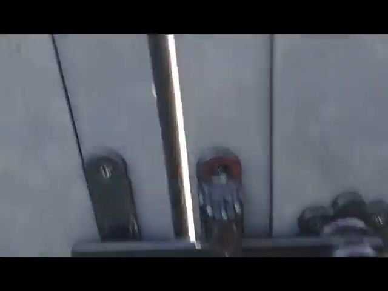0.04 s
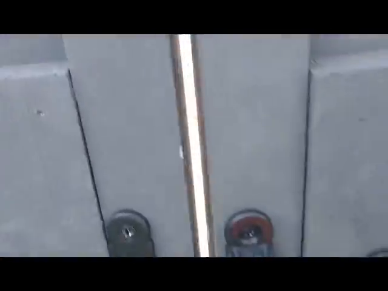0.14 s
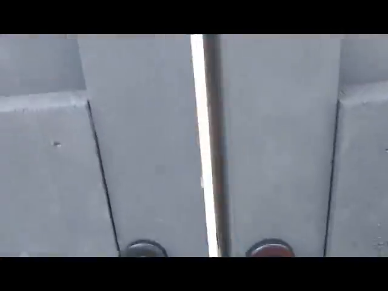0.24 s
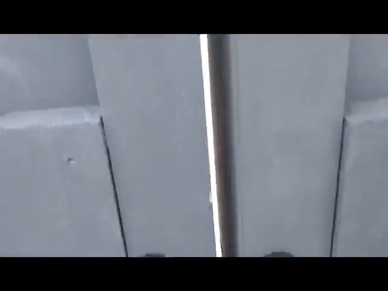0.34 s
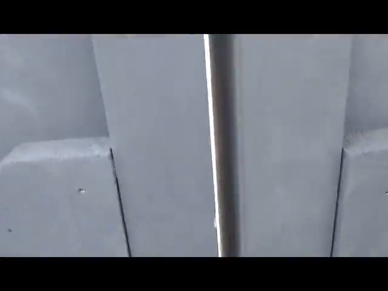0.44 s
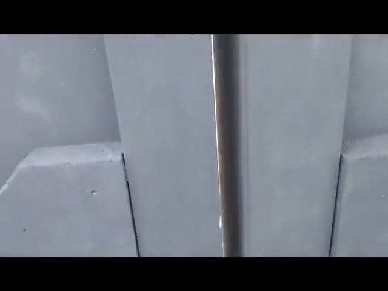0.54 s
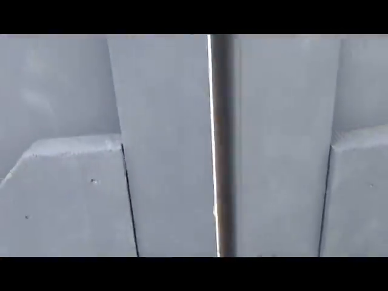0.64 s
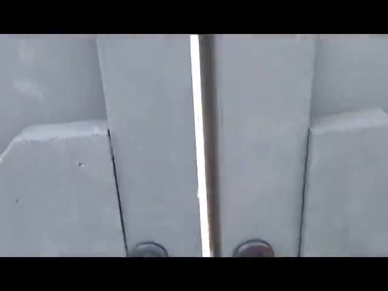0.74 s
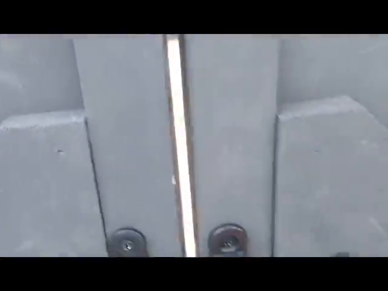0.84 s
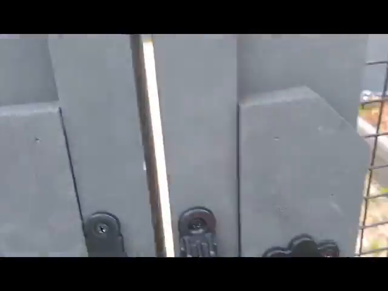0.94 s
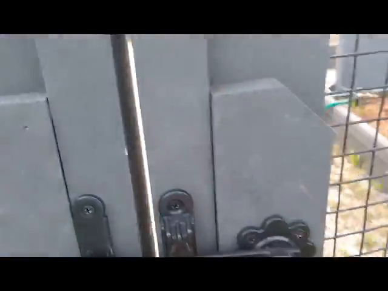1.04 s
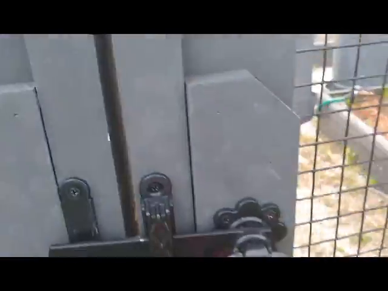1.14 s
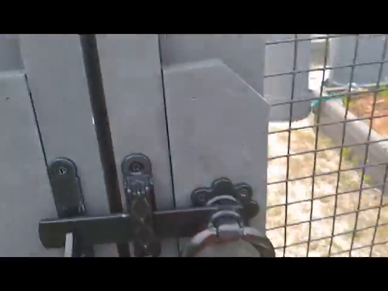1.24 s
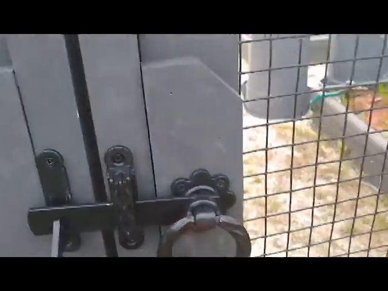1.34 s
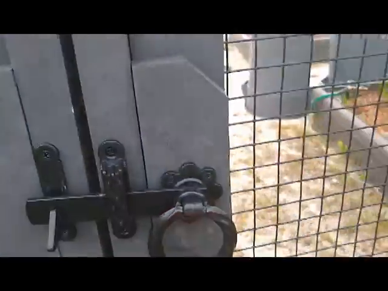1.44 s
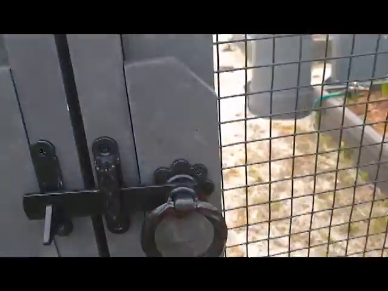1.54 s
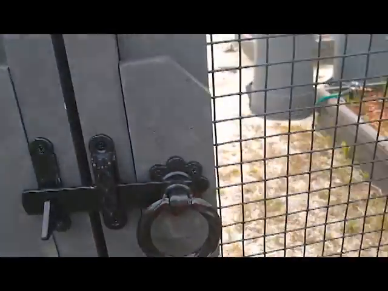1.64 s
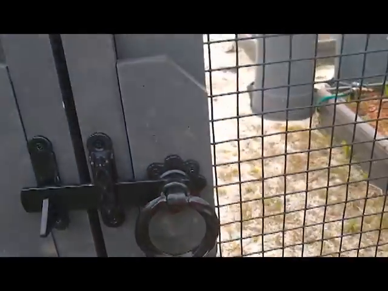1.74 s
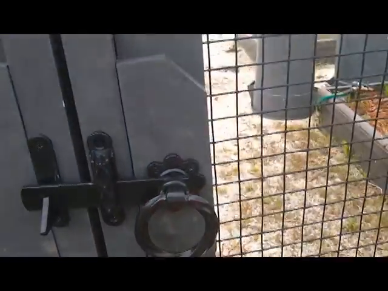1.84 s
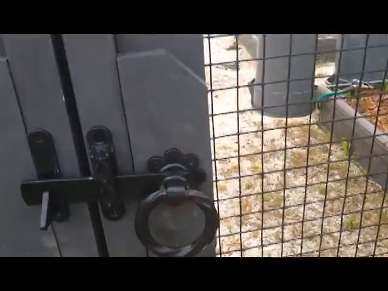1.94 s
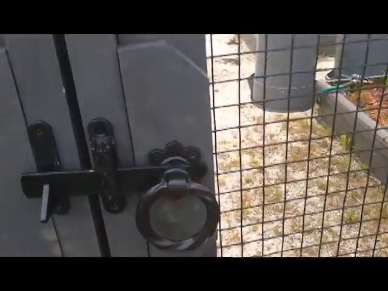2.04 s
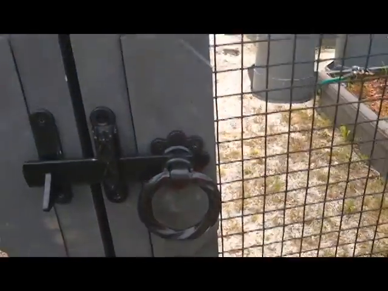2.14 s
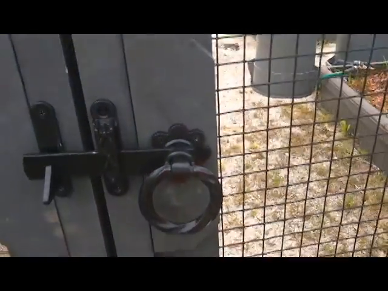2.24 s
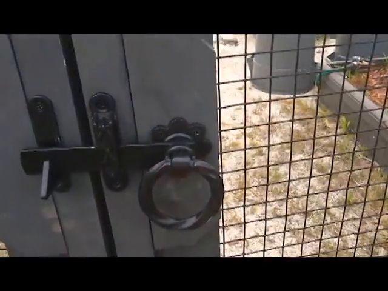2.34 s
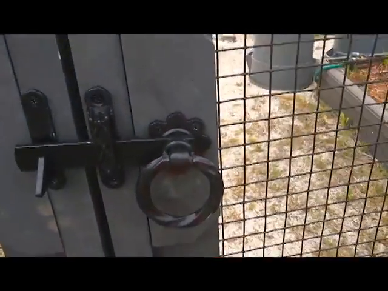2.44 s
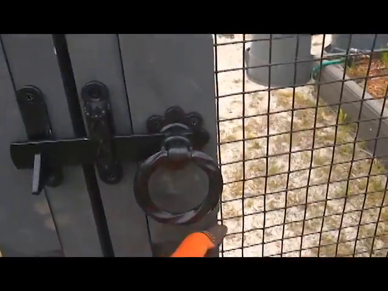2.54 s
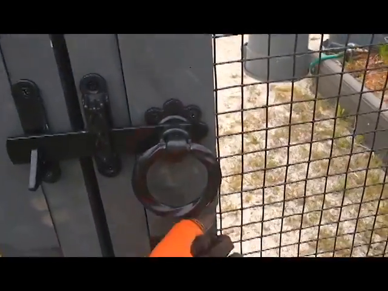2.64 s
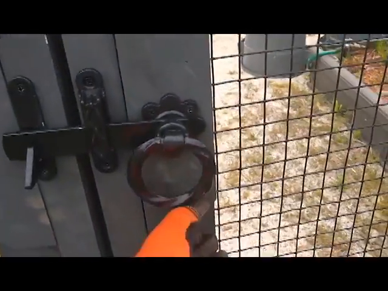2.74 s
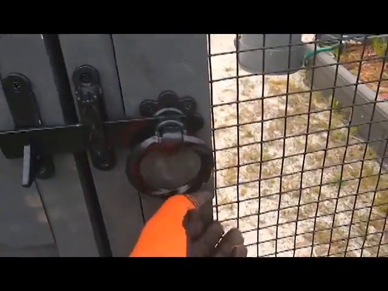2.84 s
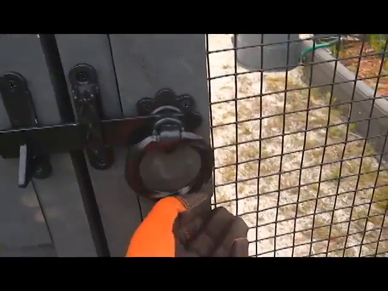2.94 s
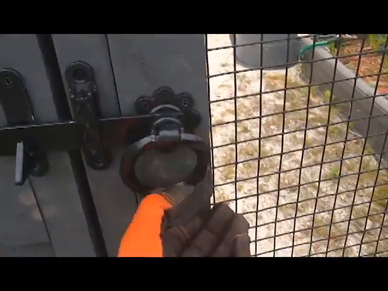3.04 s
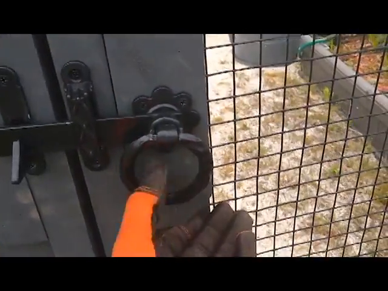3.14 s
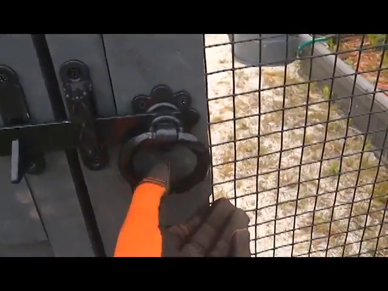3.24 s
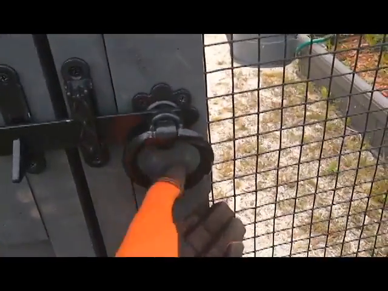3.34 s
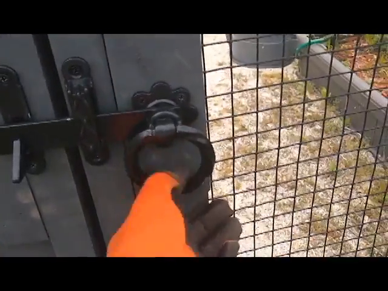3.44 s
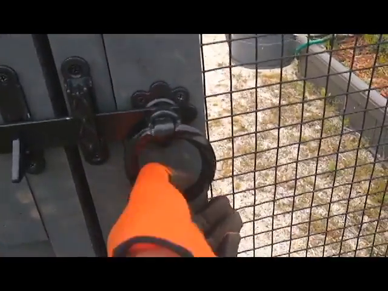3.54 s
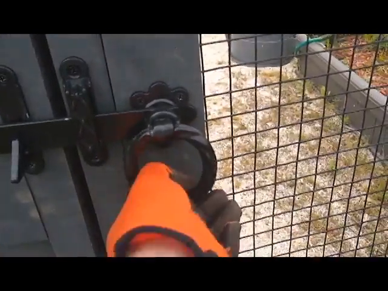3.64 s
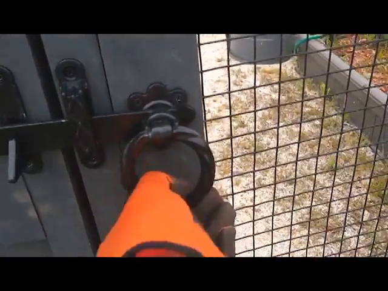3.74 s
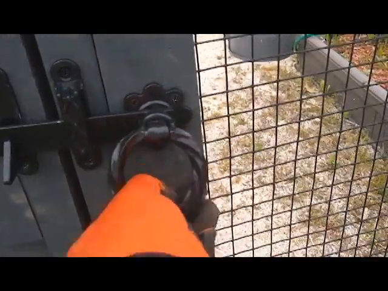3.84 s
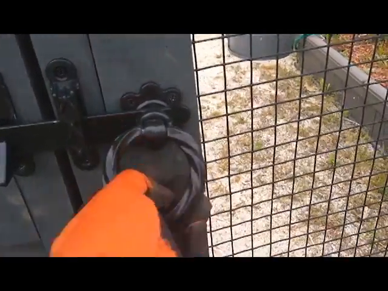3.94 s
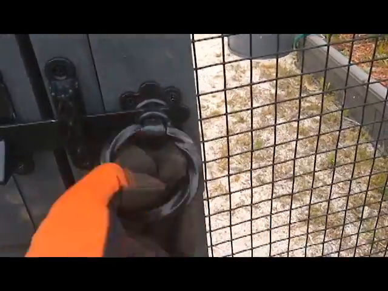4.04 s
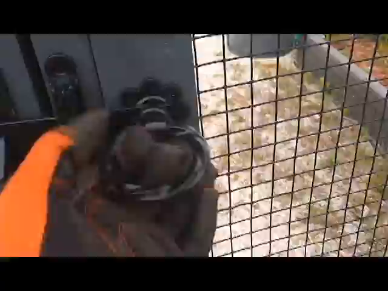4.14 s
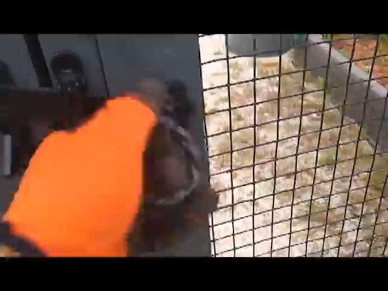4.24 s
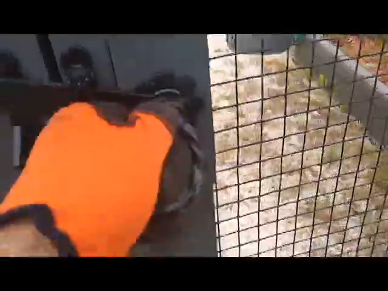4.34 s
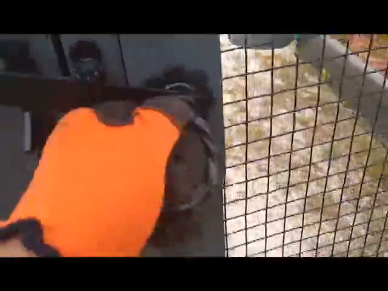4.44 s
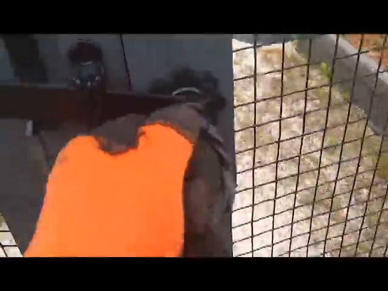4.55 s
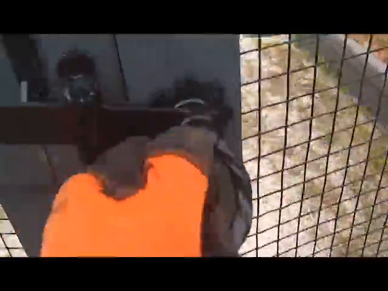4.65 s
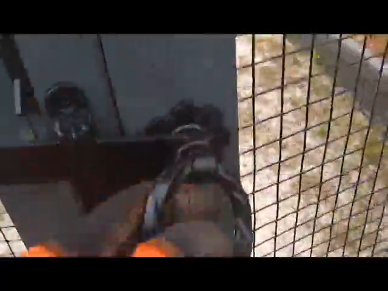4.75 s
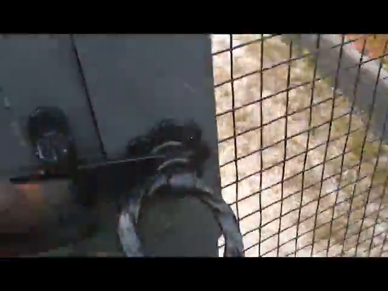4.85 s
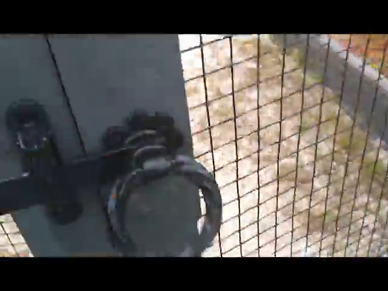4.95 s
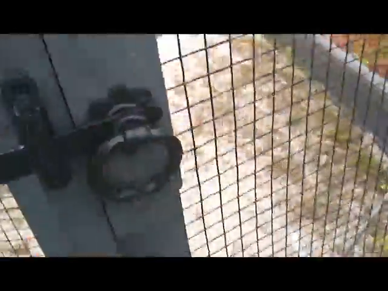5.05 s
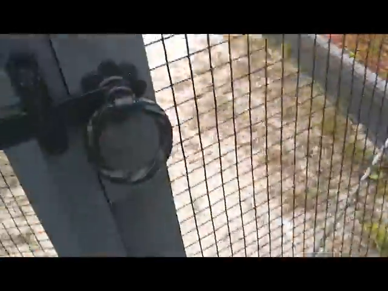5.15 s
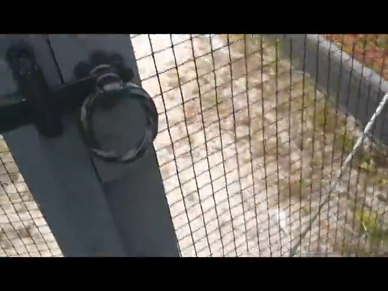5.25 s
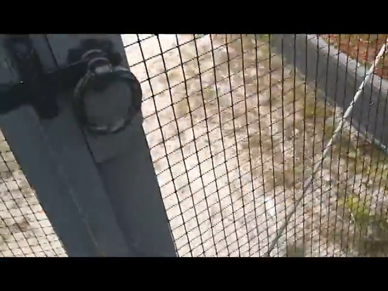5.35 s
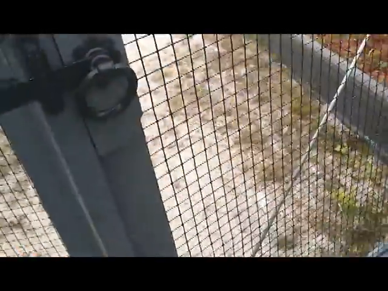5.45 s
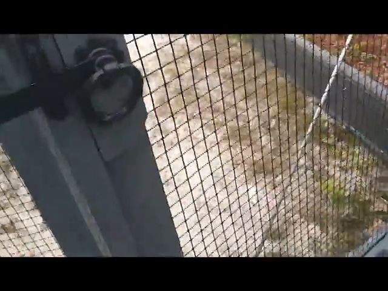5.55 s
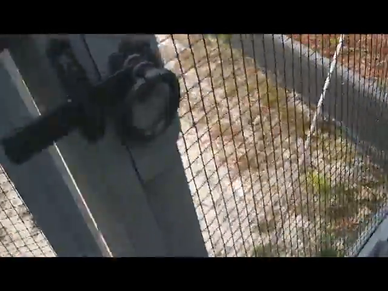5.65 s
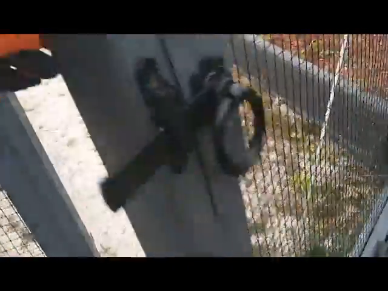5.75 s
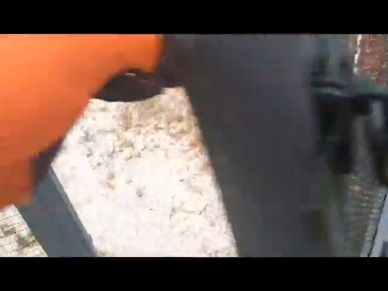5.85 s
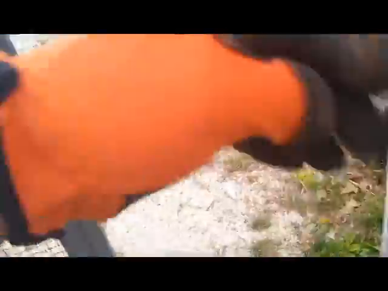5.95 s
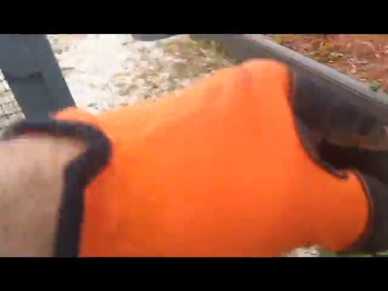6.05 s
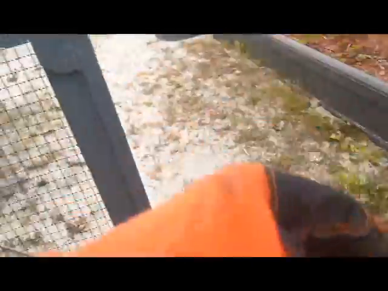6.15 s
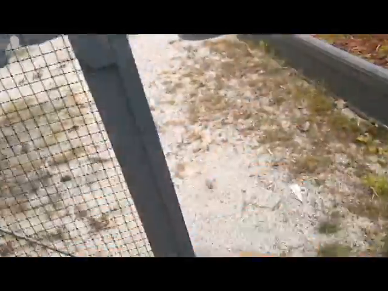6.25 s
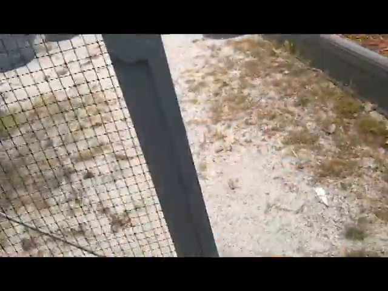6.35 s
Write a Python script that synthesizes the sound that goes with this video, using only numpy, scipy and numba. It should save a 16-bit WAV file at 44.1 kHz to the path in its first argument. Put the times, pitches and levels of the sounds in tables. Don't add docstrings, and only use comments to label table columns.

```python
import sys
import numpy as np
from scipy import signal
from scipy.fft import rfft, irfft
from scipy.io import wavfile
from scipy.ndimage import uniform_filter1d
from numba import njit

SR = 44100
rng = np.random.default_rng(int(sys.argv[2]) if len(sys.argv) > 2 else 0)


def dump(signal):
    limited = np.clip(np.atleast_2d(signal).T, -1, 1)
    pcm = np.round(limited * 32767).astype(np.int16)
    wavfile.write(sys.argv[1], SR, pcm)


def volts_from_db(level):
    exponent = np.asarray(level, float) / 20
    return 10 ** exponent


N = 282681
PORT_LAG = 6


def level(x, db=0):
    return x * volts_from_db(db) / np.sqrt(np.mean(x ** 2))


def columns(table):
    s, *cols = np.transpose(table)
    return [np.interp(np.arange(N) / SR, s, c) for c in cols]


def colour(x, spectrum):
    hz, db = np.transpose(spectrum)
    f = np.maximum(np.arange(x.shape[-1] // 2 + 1) * SR / x.shape[-1], 1)
    octaves_outside = np.maximum(np.log2(hz[0] / f), 0) + np.maximum(np.log2(f / hz[-1]), 0)
    gain_db = np.interp(np.log(f), np.log(hz), db) - 48 * octaves_outside
    return irfft(rfft(x) * volts_from_db(gain_db), x.shape[-1])


def walk(rate):
    k = int(SR / rate)
    steps = np.repeat(rng.standard_normal(N // k + 1), k)
    return 1.28 * uniform_filter1d(uniform_filter1d(steps, k), k)[:N]


def pair(likeness):
    common, apart = rng.standard_normal((2, N))
    c = np.clip(likeness, 0, 1)
    return np.sqrt(1 + c) * common + np.sqrt(1 - c) * apart * np.array([[1], [-1]])


def swell(s, length):
    return np.sin(np.pi * np.clip((np.arange(N) / SR - s) / length, 0, 1))


def decay(t, t60):
    return np.exp(-np.log(1000) * t / t60)


def add(out, s, sound):
    i = int(s * SR)
    out[:, i:i + sound.shape[1]] += sound[:, :N - i]


def whistle(table, start=0, db=0):
    rows = np.array(table) + [start, 0, db]
    before = [rows[0, 0] - .008, rows[0, 1], -120]
    after = [rows[-1, 0] + .025, rows[-1, 1], -120]
    hz, line_db = columns([before, *rows, after])
    return np.sqrt(2) * volts_from_db(line_db) * np.sin(2 * np.pi * np.cumsum(hz) / SR)


@njit
def mode(x, hz, t60):
    y, z, turn = np.empty(len(x), np.complex128), 0j, np.exp(2j * np.pi * hz / SR)
    for i in range(len(x)):
        z = z * turn * (1 - np.log(1000.) / (t60[i] * SR)) + x[i]
        y[i] = z
    return y


def clatter(lo_hz, hi_hz, t60, chance, rise_s=0.00051):
    t = np.arange(4096) / SR
    hz_chance, fade_chance, phase_chance, level_chance, side_chance = chance.T[:, :, None]
    hz = lo_hz * (hi_hz / lo_hz) ** hz_chance
    strength = volts_from_db(14.0 * level_chance) * decay(t, t60 * (0.65 + 2.28 * fade_chance))
    phase = 2 * np.pi * (hz * t + phase_chance)
    lead = 3.76 * np.minimum(hz / 1500, 1) ** 2 * (side_chance - .5)
    both = np.array([np.sum(strength * np.sin(phase + side * lead), axis=0) for side in (1, -1)])
    both = both * (1 - np.exp(-t / rise_s))
    return both / np.abs(both).max()


# f/Hz, level/dB per Hz
GARDEN_HUSH = [(200, 2.5), (500, -11), (1100, -29.5), (5000, -28), (15800, -20)]


def garden_hush():
    return level(colour(pair(0.18), GARDEN_HUSH), -80.5)


# t/s, gust level/dB, hollow murmur re gust level/dB
WIND = [(0, -55, -19.5), (.8, -74.5, 8.5), (1.25, -57.5, -11.5), (1.5, -58, -12), (2.1, -63, -14.5),
        (4.3, -61, 0.5), (4.37, -31, -15), (4.7, -68, 5.5), (5.1, -48.5, -3), (5.4, -62.5, -9),
        (5.9, -54, -16), (6.41, -43, -35)]
# f/Hz, level/dB per Hz
RUMBLE = [(12, -62), (20, -44), (32, -23.5), (73, -1), (103, -1), (177, -14), (287, -36.5), (330, -16),
          (430, -68), (730, -120)]
# t/s, peak level/dB
BUFFETS = [
    (5.724, -36.5),
    (5.918, -27.5),
    (6.016, -50),
    (6.086, -34.5),
    (6.162, -30.5),
    (6.194, -35.5),
    (6.251, -31.5),
    (6.337, -28),
]


def wind():
    rumble_db, murmur_db = columns(WIND)
    gusts = volts_from_db(2.5 * walk(14))
    out = level(colour(pair(.7) * gusts, RUMBLE)) * volts_from_db(rumble_db)
    for (s, peak_db), c in zip(BUFFETS, rng.random((len(BUFFETS), 16, 5))):
        add(out, s, volts_from_db(peak_db - 2.0) * clatter(60, 228.5, 0.054, c, rise_s=0.0045))
    out[1] = irfft(rfft(out[1]) * np.exp(1j * 1.4), N)
    for hz in (454.0, 540, 572, 570.0, 760, 1440):
        band = colour(pair(0.04), [(hz * 0.94, -10), (hz, 0), (hz * 0.88, -10)])
        band_db = rumble_db + murmur_db - 9 - 14 * (hz > 999) + 6 * walk(22)
        out = out + level(band) * volts_from_db(band_db + np.array([[1.2], [-1.2]]))
    return out


# t/s, length/s, f/Hz, level/dB
MURMURS = [
    (0.132, 0.1, 623, -66),
    (0.394, 0.12, 569, -64),
    (0.634, 0.091, 567, -66),
    (0.86, 0.21, 1270, -75.5),
    (1.072, 0.12, 1220, -73),
    (1.1, 0.27, 540, -57),
]


def murmurs():
    out = 0
    noise = pair(.6) * volts_from_db(4 * walk(40))
    for s, length, hz, db in MURMURS:
        band = colour(noise, [(hz * .85, -8), (hz, 0), (hz * 1.12, -8)])
        out = out + level(band, db) * swell(s, length)
    return out


# t/s, f/Hz, level/dB
ARCH = [(2.115, 7960, -86), (2.17, 8740, -71), (2.23, 9020, -67), (2.31, 8810, -59.5), (2.38, 8200, -69.5),
        (2.46, 6920, -56.5), (2.48, 6800, -88)]
FLAT = [(2.2, 7330, -69), (2.23, 6940, -96), (2.38, 7500, -76)]
# t/s from its start, f/Hz, level/dB
WARBLE = [(.012, 7900, -10), (.03, 8120, 2), (.05, 6740, -5), (.075, 6370, 0), (.09, 6150, -2),
          (.115, 7100, 8), (.135, 6060, 4.5), (.155, 4880, -6)]
# t/s, level/dB
WARBLES = [
    (0.888, -73),
    (1.524, -72.5),
]
# t/s from its start, f/Hz, level/dB
CHIRP_HIGH = [(.004, 3560, -9), (.014, 3710, -2.5), (.03, 3800, 8), (.042, 3950, -8.5)]
CHIRP_UPPER = [(.006, 4060, -6), (.022, 4160, -5), (.036, 4150, 1.5), (.042, 3950, -1)]
CHIRP_LOW = [(0.046, 2860, -16), (0.052, 3130, 3), (.063, 3260, 4)]
# t/s, level/dB
CHIRPS = [
    (0.336, -56.5),
    (1.849, -64.5),
    (2.631, -93),
    (2.781, -56),
    (3.738, -55),
]
# delay t/s, level over the smeared echo/dB
WALLS = [
    (.05, -9.5),
    (.145, 3),
    (.235, 5.5),
    (.345, 8.5),
]


def birds():
    thin = whistle(ARCH) + whistle(FLAT) * volts_from_db(8.7 * walk(44))
    warbles = sum(whistle(WARBLE, s, db) for s, db in WARBLES)
    thin = thin + warbles * (1 + 0.55 * walk(690)) * volts_from_db(2.1 * walk(130))
    voices = CHIRP_HIGH, CHIRP_UPPER, CHIRP_LOW
    chirps = sum(whistle(note, s, db) for s, db in CHIRPS for note in voices)
    chirps = chirps * (1 + 0.42 * walk(550))
    t = np.arange(SR // 2) / SR
    answers = 1 + sum(volts_from_db(wall_db) * np.exp(-((t - s) / 0.006) ** 2) for s, wall_db in WALLS)
    wet = 0
    for calls, t60, db in ((chirps * (1 + 1.2 * walk(1300)), 1, -7.5), (thin, .2, -2.5)):
        echo = rng.standard_normal((2, len(t))) * decay(t, t60) * answers
        echo = echo / np.sqrt(np.sum(echo ** 2, axis=1, keepdims=True))
        wet = wet + volts_from_db(db + 3 * walk(40)) * signal.fftconvolve(calls[None], echo, axes=1)[:, :N]
    return thin + chirps + wet


# t/s, f/Hz, level/dB
HINGE = [(6.275, 2163, -73), (6.31, 2290, -64.5), (6.34, 2160, -82)]


def hinge():
    squeak = whistle(HINGE) + whistle(np.array(HINGE) * [1, 2, 1])
    return squeak * volts_from_db(4 * walk(120))


# t/s, peak level/dB
TICKS = [
    (0.0293, -41),
    (0.067, -44),
    (0.082, -36),
    (0.1093, -33),
    (0.1366, -49),
    (0.16, -46),
    (0.171, -35),
    (0.1979, -53),
]
LATE_TICKS = [(1.9278, -55), (1.9402, -53), (1.9457, -41), (1.953, -45), (1.967, -29), (1.9818, -35),
              (1.996, -43), (2.003, -53), (2.0211, -45), (2.085, -35.5), (2.1119, -45), (2.1483, -53)]
# lowest f/Hz, highest f/Hz
TICK_BANDS = (7000, 14500), (9300, 15000)


def sleeve_ticks():
    out = np.zeros((2, N))
    for rows, band in zip((TICKS, LATE_TICKS), TICK_BANDS):
        crease = signal.butter(6, band, "band", fs=SR, output="sos")
        for s, db in rows:
            snap = rng.standard_normal(60) * np.exp(-np.arange(60) / 5)
            tick = signal.sosfilt(crease, np.append(snap, np.zeros(200)))
            tick = volts_from_db(db - 3.5) * tick / np.abs(tick).max()
            add(out, s, np.array([np.roll(tick, PORT_LAG), tick]))
    return out


# t/s, speed as hiss level/dB, pressure as scrape re hiss level/dB
RUB = [(0, -71.5, -13.5), (1.3, -78, -4.5), (2.3, -90.5, 5), (2.68, -51.5, -27.5), (2.8, -64, 3),
       (3.1, -59.5, 4.5), (3.6, -60.5, 6.5), (3.78, -53, -13), (3.9, -50.5, -1), (4.2, -47.5, 4),
       (4.4, -36, 7.5), (4.55, -59, 7), (4.9, -43, -5), (5.22, -37.5, -1.5), (5.34, -44, -5.5),
       (5.7, -48.5, -11.5), (6.1, -47, -5.5), (6.25, -50.5, -30)]
# f/Hz, level/dB per Hz
HISS = [(3400, 1.5), (5000, -4), (9000, -2.5), (11000, 3), (13000, -10.5), (16300, -7.5)]
SCRAPE = [(700, -18), (1050, 4), (1600, -2.5), (2600, -0.5), (4000, -2)]
# lowest f/Hz, highest f/Hz
FOLDS = (2000, 6000), (6800, 10000), (11300, 16500)
# t/s, length/s, level/dB, lowest f/Hz, highest f/Hz
SWISHES = [(-.03, 0.35, -61, 7500, 15400), (0.324, 0.11, -62, 6410, 13930),
           (0.557, 0.079, -66, 6440, 11500), (0.777, 0.0051, -22.5, 11200, 14500),
           (0.757, 0.17, -63, 2170, 12000), (0.883, 0.37, -64, 4570, 14900),
           (1.897, 0.23, -62, 10000, 14000), (2.397, 0.27, -57.5, 4430, 17000),
           (3.432, 0.07, -41, 2500, 16400), (2.955, 0.054, -50.5, 9000, 15900),
           (3.751, 0.23, -46, 7400, 15150), (4.393, 0.066, -51, 13500, 15600),
           (4.23, 0.13, -30.5, 2050, 15100), (4.383, 0.065, -26.5, 303, 14050),
           (5.268, 0.066, -37.5, 7650, 13650), (5.461, 0.024, -41, 7650, 12600),
           (6.011, 0.05, -40.5, 2950, 15700), (6.015, 0.041, -31.5, 8660, 13660)]
# t/s, length/s, level/dB
PAUSES = [
    (3.112, 0.073, -8),
    (4.972, 0.06, -40),
    (5.326, 0.055, -5),
    (5.484, 0.036, -10),
    (6.116, 0.051, -7.5),
]


def rustle():
    hiss_db, pressure_db = columns(RUB)
    cloth = pair(.4) * volts_from_db(2.5 * walk(400) + 1.2 * walk(60) + 2.5 * walk(18))
    hiss = level(colour(cloth, HISS))
    folds = [colour(hiss, [(lo_hz, 0), (hi_hz, 0)]) * volts_from_db(3 * walk(12)) for lo_hz, hi_hz in FOLDS]
    out = level(sum(folds)) * volts_from_db(hiss_db)
    grains = pair(0.59) * volts_from_db(3.7 * walk(150) + 1.4 * walk(700) + 3.7 * walk(37))
    out = out + level(colour(grains, SCRAPE)) * volts_from_db(hiss_db + pressure_db)
    for s, length, db, lo_hz, hi_hz in SWISHES:
        band = [(lo_hz, -1.5), (np.sqrt(lo_hz * hi_hz), 0), (hi_hz, -5)]
        i, k = max(int(s * SR), 0), int((s + length) * SR)
        swish = level(colour(colour(cloth[:, k:i:-1], band), band), db)
        add(out, i / SR, swell(s, length)[i:k] ** 1.17 * swish)
    out = out * volts_from_db(sum(db * swell(s, length) for s, length, db in PAUSES))
    return out + sleeve_ticks()


# t/s, lower lines level/dB, upper lines level/dB
BAR_SONG = [(2.705, -38.5, -60), (2.868, -77, -62), (3.175, -45, -58.5), (3.287, -22, -44),
            (3.52, -51, -70), (4.188, -60, -62), (4.263, -36, -61), (4.299, -36, -60), (4.325, -38, -57),
            (4.936, -44, -49), (4.96, -35, -39), (5.013, -24.5, -28), (5.058, -30, -46), (5.104, -41, -31),
            (5.152, -25, -43), (5.373, -46, -60), (5.557, -30, -35.5)]
BAR_LINES = [12270, 12330, 14480, 15210]


def bar_song():
    s, lower_db, upper_db = np.transpose(BAR_SONG)
    chance = rng.random((len(s), len(BAR_LINES), 2))
    out = 0
    for k, hz in enumerate(BAR_LINES):
        hits = np.zeros(N, complex)
        hit_db = (lower_db, upper_db)[k // 2] - 4.0 + 6.9 * (chance[:, k, 0] + 1.0)
        hits[(s * SR).astype(int) + 20] = volts_from_db(hit_db) * np.exp(2j * np.pi * chance[:, k, 1])
        z = mode(hits, 1. * hz, np.full(N, .075)) * volts_from_db(3 * walk(90))
        out = out + np.array([(z * np.exp(1.3j * k)).imag, z.imag])
    return out


# t/s, low level/dB, middle level/dB, main level/dB, high level/dB
STRIKES = [(2.8702, -36.5, -62, -56, -72), (2.9688, -51, -64, -36.5, -63), (3, -33, -63, -99, -99),
           (3.023, -75, -47, -99, -99), (3.1726, -64, -40.5, -46, -64), (3.248, -44.5, -99, -99, -99),
           (3.286, -56, -47, -29.5, -41), (3.329, -75, -72, -99, -99), (3.385, -78, -60, -55, -99),
           (3.521, -77, -70, -64, -78), (3.918, -72, -70, -42, -75), (4.276, -28.5, -50, -28, -61),
           (4.3732, -61.5, -54, -54.5, -60), (4.528, -72, -75, -49.5, -81.5),
           (4.9616, -28, -30, -33.5, -49), (4.983, -68, -54, -67, -64), (5.0121, -56, -33.5, -18, -26),
           (5.057, -52, -42, -41, -56.5), (5.105, -41, -25.5, -32.5, -42.5), (5.1342, -36, -99, -99, -35),
           (5.153, -27, -43, -28, -47), (5.2253, -34.5, -65, -99, -99), (5.3717, -50.5, -58, -52, -71),
           (5.56, -56, -41, -34, -46), (5.578, -38.5, -99, -99, -99)]
RING_MODES = [4400, 6255, 6790, 7260, 8690, 9200, 9430, 10902, 11055, 12293, 13558, 13965, 15210, 15465]
# level re the struck line/dB, t60/s
RING = [(-8.5, 0.099), (0.5, 0.15), (-6, 0.065), (-5, 0.07), (17.5, 0.11), (3, 0.086), (-3, 0.089),
        (2.5, 0.2), (-7, 0.172), (-11.5, .08), (2.5, 0.36), (-13.5, .15), (7, .12), (3, 0.097)]
FOLLOWS = [0, 0, 0, 0, 1, 1, 2, 2, 2, 2, 3, 3, 3, 3]
LASTING = [6255, 8690, 10902, 13558]
# left lead/rad, left minus right level/dB, wander of lead/rad
LINE_SIDES = [(1.5, -2, .8), (3, -1, .3), (1.9, -4, 1.4), (.4, 2, .3)]
SWING = -18.5, -31.5


def ring():
    s, *line_db = np.transpose(STRIKES)
    at, t = (s * SR).astype(int), np.arange(N) / SR
    chance = rng.random((len(STRIKES), len(RING), 2))
    swing = swell(5.17, .11)
    out = sum(volts_from_db(db) * swing * np.sin(2 * np.pi * hz * t) for hz, db in zip(LASTING[2:], SWING))
    for k, (hz, (db, t60), line) in enumerate(zip(RING_MODES, RING, FOLLOWS)):
        hits, ringing = np.zeros(N, complex), np.full(N, t60)
        uneven_db = 14 * (hz not in LASTING) * (chance[:, k, 0] - .5)
        hits[at + 20] = volts_from_db(line_db[line] + db + uneven_db) * np.exp(2j * np.pi * chance[:, k, 1])
        for i in at[line_db[line] > -90]:
            ringing[i - 60:i] = .002
        z = mode(hits, 1. * hz, ringing) * volts_from_db(3 * walk(70)) * np.exp(.5j * walk(110))
        lead, pan_db, wander = LINE_SIDES[line] if hz in LASTING else (1.3 * k, -2, 1)
        lead = lead + wander * walk(8) - 2 * np.pi * hz * PORT_LAG / SR
        left, right = (z * np.exp(1j * lead)).imag, z.imag
        out = out + np.array([left * volts_from_db(pan_db / 2), right * volts_from_db(-pan_db / 2)])
    return out


# t/s, peak level/dB
THUDS = [
    (.778, -47),
    (3.609, -64),
    (4.015, -31.5),
    (4.368, -27),
    (4.439, -28),
    (4.683, -43.5),
    (5.01, -35.5),
    (5.153, -31),
    (5.856, -34.5),
]


def thuds():
    out = np.zeros((2, N))
    for (s, peak_db), c in zip(THUDS, rng.random((len(THUDS), 40, 5))):
        add(out, s, volts_from_db(peak_db - 0.5) * volts_from_db(3) * clatter(190, 900, 0.085, c, rise_s=0.002))
    return out


# t/s, peak level/dB, share into the boards/dB
ON_BOARD = [(1.137, -51, -8.5), (2.695, -35, -18), (2.931, -12, -10), (2.983, -41, 12),
            (3.385, -21.5, -26.5), (3.907, -36.5, 9), (3.917, -11, -16), (3.951, -26.5, -7),
            (4.014, -23, -0.5), (4.026, -19, -7), (4.123, -21.5, -10), (4.563, -26.5, -4),
            (4.93, -21, -7.5), (5.005, -7.5, -20), (5.386, -19, -28), (5.522, -15, -19), (5.551, -20, -6.5),
            (5.855, -13, -6)]
# t/s, peak level/dB, share into the boards/dB
ON_IRON = [(3.001, -28, -16), (3.279, -22, -17.5), (3.287, -8.5, -20), (3.331, -23, -18), (3.684, -23, -56),
           (3.724, -27, -80), (3.842, -22, -34), (4.187, -13.5, -12), (4.962, -20, -24.5),
           (5.01, -0.5, -22.5), (5.054, -11, -8), (5.071, -16.5, -17), (5.092, -20, -15),
           (5.1035, -2, -17.5), (5.133, -12, -24), (5.152, -4, -6.5), (5.18, -13, -62), (5.373, -28, -14),
           (5.557, -8, -16.5), (5.817, -26, -17.5), (6.024, -23.5, -5.5), (6.083, -19.5, -14.5)]
# t/s, peak level/dB, share into the boards/dB, bar f/Hz
BAR = [(.777, -20, -35.5, 7960), (2.704, -7.5, -26.5, 2810), (2.7455, -13, -14, 2860),
       (2.959, -18, -16, 2780), (3.174, -14.5, -28, 4400), (3.452, -17.5, -17, 3250),
       (3.519, -12, -32, 2640), (3.73, -28.5, -72, 4300), (3.894, -12.5, -9.5, 4300),
       (4.255, -25.5, -5.5, 5000), (4.283, -10, -34, 7400), (4.3, -14, -12.5, 7200),
       (4.312, -5.5, -12, 5580), (4.326, -2.5, -42, 8680), (4.373, 7.5, -35, 8030), (4.427, -17, -14, 3300),
       (4.61, -22, -12, 2630), (4.621, -27.5, -16, 3540), (4.741, -24, -7, 2810), (4.82, -14, -12.5, 2897),
       (4.859, -31, -28, 3730), (4.881, -22.5, -19, 3280), (5.776, -14.5, -25, 1597),
       (5.838, -19.5, -15, 4660), (5.969, -35, -10, 3850), (6.014, -25, -29, 3540), (6.236, -35, -23, 3730)]
# t/s, peak level/dB, share into the boards/dB, resonance f/Hz
MUFFLED = [(1.558, -61, 1, 3300), (2.807, -34.5, -5.5, 3220), (2.857, -14, -16, 1707),
           (2.867, -14, -11, 3580), (2.924, -22, -18, 2780), (2.9655, -12.5, -9.5, 3290),
           (3.021, -20, -18, 4340), (3.104, -29.5, -17, 1126), (3.166, -19, -13, 4440),
           (3.474, -24.5, -10, 1323), (3.513, -21.5, -8, 1500), (3.61, -27, 1, 1740),
           (3.987, -28.5, 3, 930), (4.049, -28.5, -7.5, 1350), (4.275, -5, -12.5, 2500),
           (4.362, -18, -15, 930), (4.439, -22.5, 1, 1070), (4.53, -17.5, -10.5, 3140),
           (4.653, -25.5, -1, 1360), (4.682, -51, 19, 1660), (4.984, -38, -25, 3400),
           (5.509, -22, -12, 1735)]
# t/s, peak level/dB, share into the boards/dB, f/Hz
RATTLE = [(2.909, -44, -37, 9000), (3.583, -34, -22, 9000), (3.703, -38, -31, 3510),
          (3.83, -31.5, -35, 4200), (3.85, -36.5, -22.5, 6000), (4.219, -47, -18, 3000),
          (4.49, -33, -27, 8000), (4.828, -18.5, -13.5, 9900), (4.902, -25, -29, 3130),
          (4.915, -29.5, 5, 4000), (4.936, -31, -22.5, 12400), (4.946, -21, -26, 5450),
          (4.972, -21.5, -2, 3100), (4.988, -41, 6.5, 2560), (5.025, -10.5, -15.5, 9700),
          (5.159, -8.5, -26, 2940), (5.789, -27, -8, 4930), (5.912, -31, -17, 8700),
          (6.094, -45.5, -30.5, 2970), (6.111, -46.5, -40, 9000), (6.181, -43, -42, 6200),
          (5.1045, -8, -40, 9200), (.778, -33.5, -13, 4390), (3.2845, -30, -27, 12300),
          (3.17, -27, -8, 4480), (4.816, -22, -16, 1140)]


def blows():
    on_board = [(*row, 1171) for row in ON_BOARD]
    on_iron = [(*row, 12140) for row in ON_IRON]
    kinds = ((on_board, -2, -12), (on_iron, 2.5, -9), (BAR, -2, -7.5),
             (MUFFLED, -17.5, -10), (RATTLE, -2.5, 8))
    return [(*row, top_db, air_db) for rows, top_db, air_db in kinds for row in rows]


def knocks():
    out = np.zeros((2, N))
    rows = blows()
    chance = rng.random((len(rows), 5, 40, 5))
    t = np.arange(4096) / SR
    noise = rng.standard_normal((2, len(rows), 2, 4096))
    scatter = colour(noise[0], [(500, -12), (1200, 18.0), (4000, 11.5), (15000, -1.5)])
    splinter = colour(noise[1], [(2500, -28.5), (8000, 13.5), (16300, -14.5)])
    chatter = np.append(volts_from_db(np.clip(0.36 * walk(1500), -9, 4)), np.ones(4096))
    knee_hz = 11500
    for (s, peak_db, board_db, hz, top_db, air_db), c, tail, grit in zip(rows, chance, scatter, splinter):
        t60 = 0.04 * volts_from_db(0.15 * (board_db + 22.5))
        board = volts_from_db(-16.0) * clatter(349.6, 930.4, 2.0 * t60, c[0, :5])
        board = board + volts_from_db(3) * clatter(904.5, 2482, 0.35 * t60, c[1, :18])
        iron = volts_from_db(-4.0) * clatter(2511, 7000, 0.32 * t60, c[2])
        chips = volts_from_db(top_db + 0.5) * clatter(7000, 15820, .17 * t60, c[3])
        crack = level(grit, top_db - 37.0) * decay(t, 0.2 * t60) * (1 - np.exp(-t / 0.0006))
        note = volts_from_db(-7.0) * clatter(hz - 140, hz + 140, .42 * t60, c[4, :2])
        tail = level(tail, -20.0 + 0.18 * (board_db + 20.5)) * decay(t, 2.4 * t60)
        tail = tail * (1 - np.exp(-t / 0.0003))
        blow = volts_from_db(board_db) * board + (iron + chips + crack) * chatter[int(s * SR):][:4096] + note + tail
        loss_db = min(air_db - 0.3 * (peak_db + 11), 0)
        blow = colour(blow, [(10, 0), (knee_hz, 0), (0.88 * knee_hz, loss_db), (SR / 2, loss_db)])
        scuff_s = 0.0001 + 0.00058 * c[0, -1, 0]
        add(out, s, volts_from_db(peak_db - 2.1) * blow * (1 - np.exp(-t / scuff_s)))
    return out


# f/Hz, left minus right level/dB
SIDES = [(200, -2.5), (400, 6.5), (800, 2), (2400, -6.5), (5000, -6.5), (20000, -1.5)]
# t/s, left minus right level/dB
TURN = [(0, -10.5), (.8, 3), (1.2, 6), (2.6, 0.5), (3.7, 1), (4.2, 2.5), (4.7, 1.5), (5.5, -1.5), (6.2, 0)]


def ports(x):
    half = np.array([(10, 0)] + SIDES) * [1, .5]
    left = colour(x[0], half)
    right = np.roll(colour(x[1], half * [1, -1]), PORT_LAG)
    return np.array([left, right]) * volts_from_db(columns(TURN)[0] * np.array([[.5], [-.5]]))


def scene():
    latch = ports(rustle() + bar_song() + ring() + thuds() + knocks())
    return garden_hush() + wind() + murmurs() + birds() + hinge() + latch


def roll_off(x):
    return signal.sosfilt(signal.butter(12, 16410, fs=SR, output="sos"), x)


def record(dry):
    low_pass = signal.ellip(6, .3, 45, 15850, fs=SR, output="sos")
    mix = signal.sosfilt(low_pass, np.clip(dry, -1, 1))
    return roll_off(mix)


dry = scene()
out = record(dry)
dump(out)
```